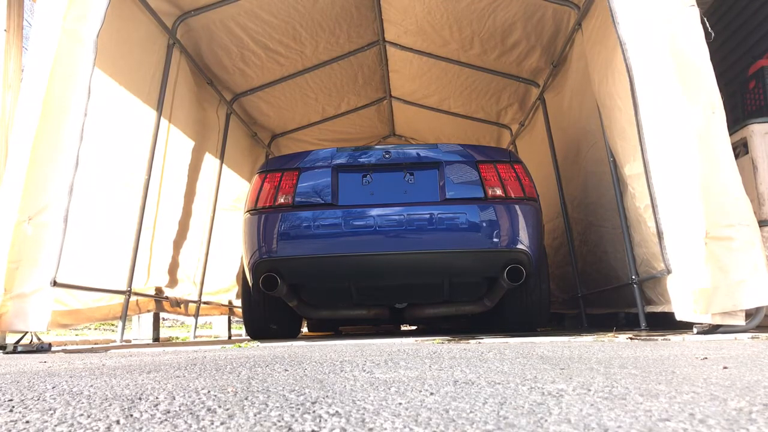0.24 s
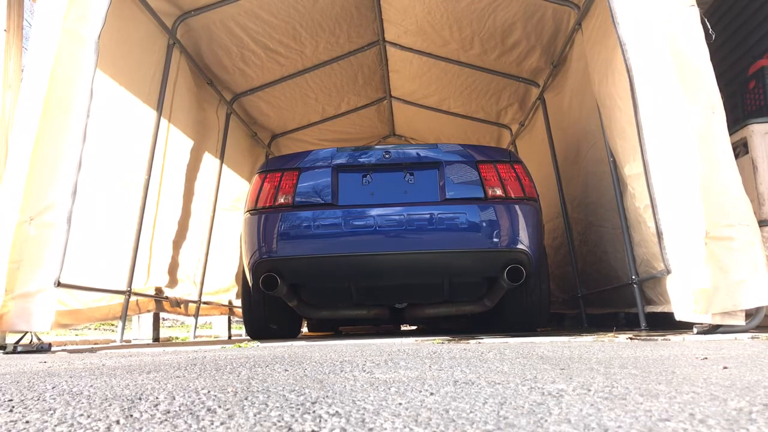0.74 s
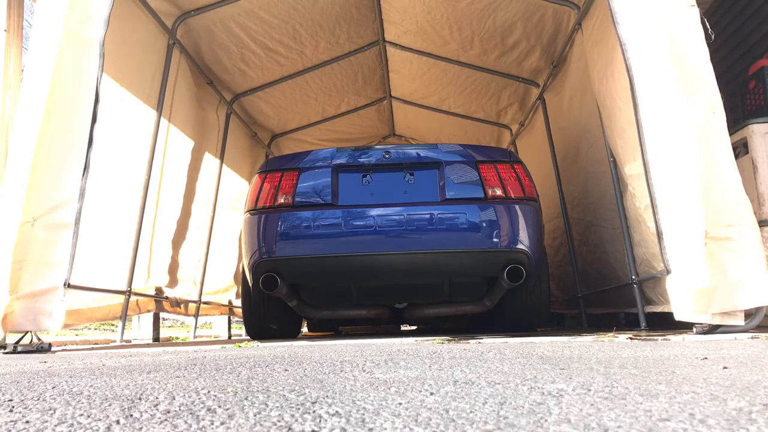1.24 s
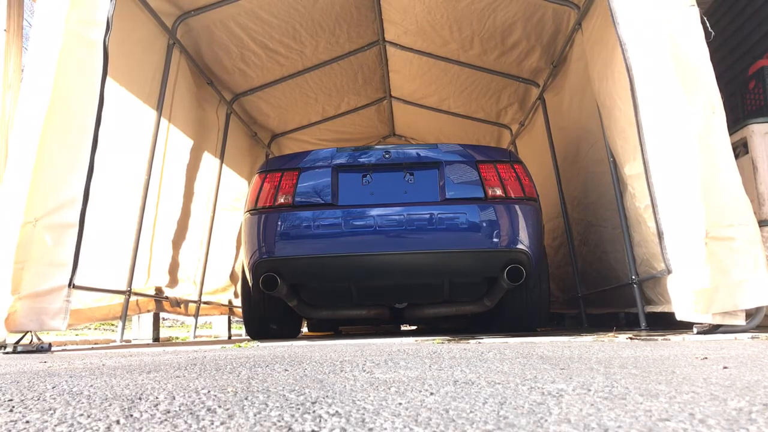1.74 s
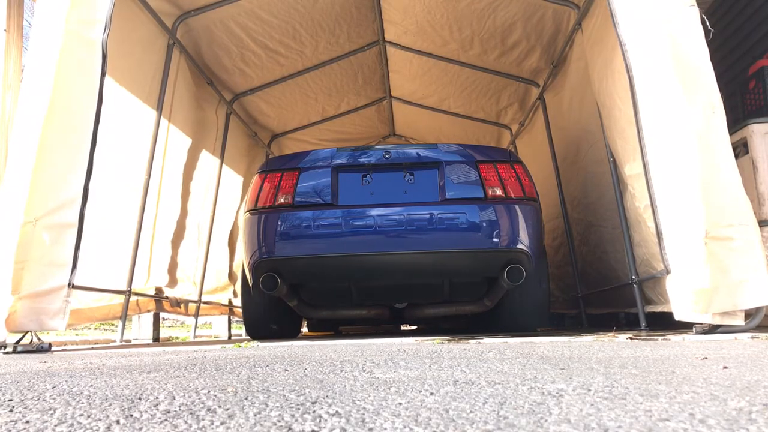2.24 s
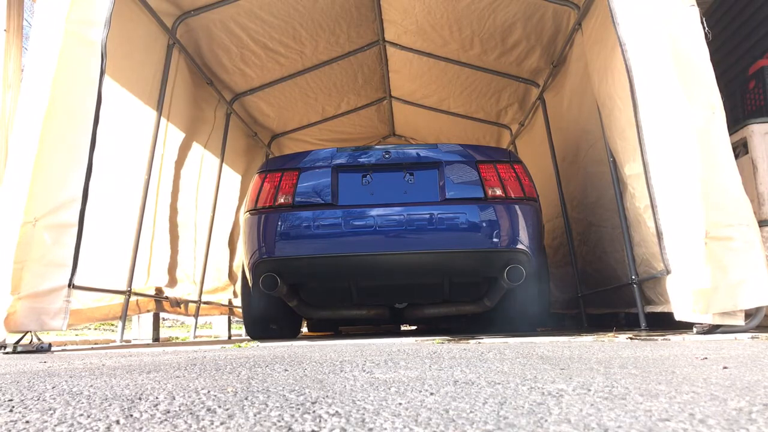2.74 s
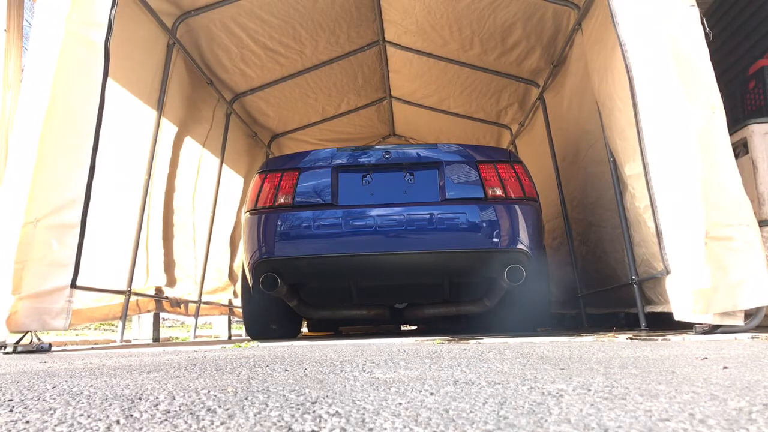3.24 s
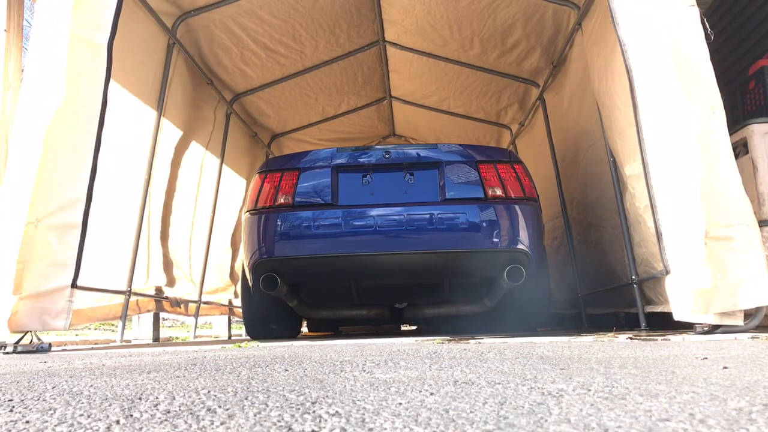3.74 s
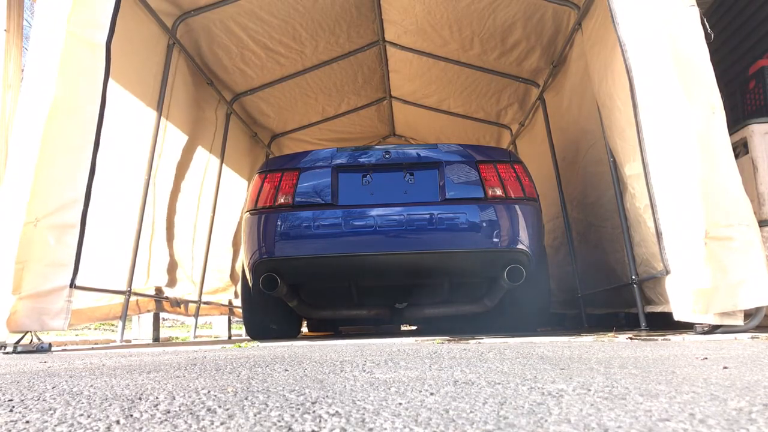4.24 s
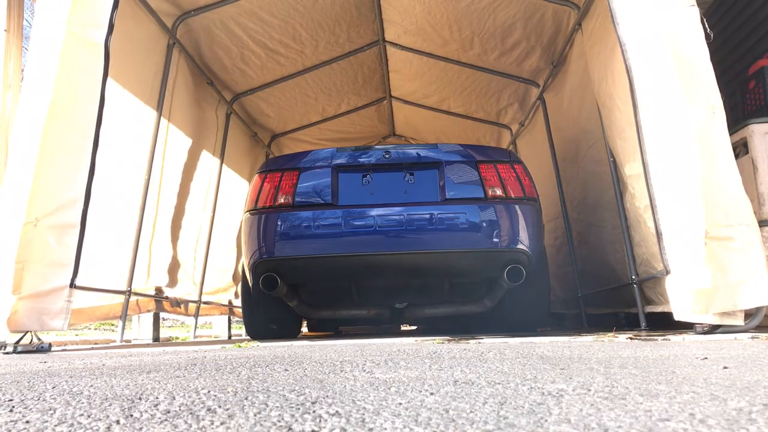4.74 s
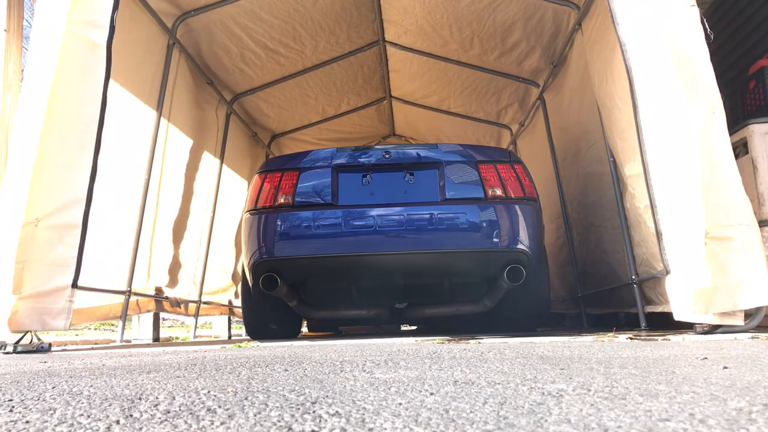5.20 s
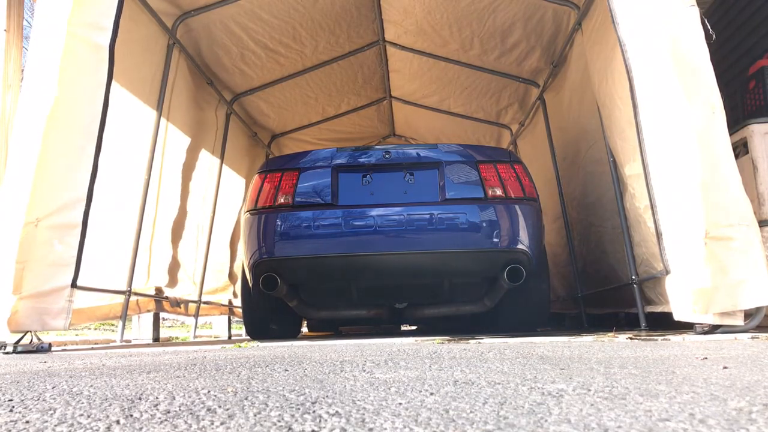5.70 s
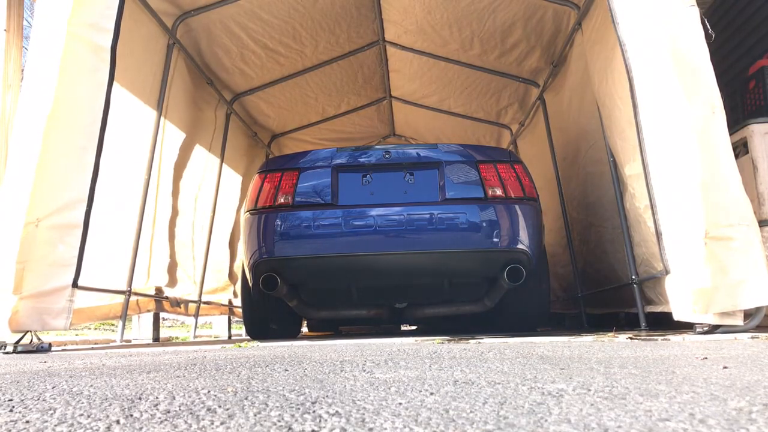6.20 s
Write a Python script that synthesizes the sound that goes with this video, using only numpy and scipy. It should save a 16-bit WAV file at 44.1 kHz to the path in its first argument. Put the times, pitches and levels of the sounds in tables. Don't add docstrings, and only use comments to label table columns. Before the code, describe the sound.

Heard from low behind a car in a fabric carport: a starter grinds in quick pulses for half a second, then the engine catches with a boom and bright tinny rasp, races briefly and eases into a fast droning idle, throbbing unevenly, with soft mechanical hiss. A small click and skip occurs early in the idle.

```python
import sys
import numpy as np
from scipy import signal
from scipy.fft import rfft, irfft
from scipy.io import wavfile

SR = 44100
rng = np.random.default_rng(int(sys.argv[2]) if len(sys.argv) > 2 else 0)


def field_ratio(decibels):
    return 10 ** (np.asarray(decibels, dtype=float) / 20)


def dump_mix(stems):
    frames = np.atleast_2d(stems).T
    limited = np.clip(frames, -1, 1)
    pcm = np.round(limited * 32767).astype(np.int16)
    wavfile.write(sys.argv[1], SR, pcm)


N = 284886
T = np.arange(N) / SR
HZ = np.fft.rfftfreq(N, 1 / SR)

# (time [s], grind [dB], gear tone [Hz], gear tone level [dB])
STROKES = [
    (.015, -37.5, 329.6, -36),
    (.075, -41, 305.6, -35),
    (.165, -38.5, 336.8, -26.5),
    (.268, -38, 378.6, -42),
    (.365, -37, 405.5, -38),
    (.49, -41.5, 344, -40),
]
STROKE_HALF_S, GEAR_HALF_S, COAST_DB, STARTER_OFF_S = 0.043, 0.026, -39.5, 0.497
GEAR_DB, GEAR_LAG_S, WHIRR_DB = -49.5, 0.0079, -55.5
GROAN_S, GROAN_HZ, GROAN_DB, GROAN_HALF_S, GROAN_SAG_HZ_PER_S = .36, 843, -31.5, 0.0253, 550
# (frequency [Hz], level [dB per Hz])
GRIND_COLOUR = [(35, -46), (60, -19), (76, -36), (168, -4), (338, 5), (515, -16), (682, -9), (822, -2),
                (1090, -8), (1200, -12.5), (1910, -1), (2090, 1.5), (6280, -8.5), (11500, -21.5),
                (16000, -31.5)]
# (frequency [Hz], width [Hz], level [dB])
BODY = [(104, 88, 8), (726, 67, -4), (1000, 430, -8), (1191, 29, -1.5), (1400, 140, -6.5), (1612, 9, 3),
        (2080, 55, -22.5), (2390, 30, -16), (2885, 7.8, -4), (4160, 4.3, -5.5)]

# (time [s], level [dB], half-length [s])
GUSTS = [
    (.05, -34, 0.18),
    (.58, -8.5, 0.057),
    (.97, -41, .05),
    (1.17, -45, 0.087),
    (2.39, -43, .05),
    (5.78, -49, 0.033),
]
CALM_DB = -60

# (time [s], speed [engine cycles per s])
SPEED_BEFORE = [
    (0.5, 4.97),
    (0.64, 10.227),
    (0.79, 14.145),
    (0.9, 15.153),
    (1.09, 14.651),
    (1.75, 13.674),
    (2.02, 13.044),
    (2.4, 13.906),
]
SPEED_AFTER = [(2.5, 13.855), (2.87, 13.752), (3.47, 13.372), (4.48, 13.373), (4.82, 13.5), (5.1, 13.399),
               (5.71, 13.362), (6.01, 13.199)]
# (time [s], share of a cycle)
MARK_BEFORE, MARK_AFTER = (.72, .537), (2.42, .574)
CUT_S, CUT_STEP = 2.39306, -0.25
IDLE_SPEED = 13.4

FIZZ_DB, FIZZ_S, FIZZ_CUT_S, FIZZ_CUT_LEN_S = -43, 0.43, .7, 0.095
# (frequency [Hz], level [dB per Hz])
FIZZ_COLOUR = [(3000, -30), (7000, 6), (10000, -0.5), (14000, -12), (16000, -15)]
RASP_S, RASP_RISE_S, RASP_HOLD_S, RASP_DB, RASP_FALL_DB_PER_S = 0.462, 0.1, 0.63, -32, 105
LINGER_DB, LINGER_AT_S, LINGER_S = -40.5, 0.83, 0.31
# (frequency [Hz], level [dB per Hz])
RASP_COLOUR = [(350, -53), (600, 2), (748, -6), (801, -5.5), (1100, -14.5), (1640, -8.5), (2240, -19),
               (3730, -13), (4580, -14.5), (6640, -20), (10500, -28), (12800, -27), (16000, -40)]
# (frequency [Hz], width [Hz], level [dB])
TIN = [(1715, 170, 1.5), (2980, 32, 2), (3760, 320, -3), (6340, 500, -11)]
# (frequency [Hz], level [dB per Hz])
IDLE_COLOUR = [(590, 3), (1000, 0.5), (1070, -12), (1190, -9), (1610, -4.5), (1750, -6), (2050, -9),
               (3710, -7), (5130, -13.5), (6470, -12), (8750, -19), (10400, -21.5), (12300, -22),
               (15100, -26.5), (16000, -45.5)]
IDLE_DB = -47.5

# (push into first pipe [ratio], its lag [ms], push into second pipe [ratio], its lag [ms])
CYLINDERS = [(0.11, 0.55, 0.42, -0.44), (0.25, -1.36, 0.28, -0.57), (0.23, 0.44, 0.27, -0.73),
             (-1.0, -0.48, 1.0, 1.52), (0.19, 2.74, 0.65, 0.2), (0.21, -0.56, 0.38, -0.42),
             (0.51, -1.35, 0.29, -0.78), (-0.22, 0.25, 0.56, 0.21)]
# (frequency [Hz], width [Hz], level [dB], polarity [+1 or -1])
PIPE_1 = [(50.0, 60.6, -44.1, 1), (87.7, 19.6, -36.5, 1), (211.7, 14.1, -30.4, -1),
          (278.8, 11.0, -26.1, -1), (299.0, 11.0, -27.4, -1), (302.8, 11.0, -24.0, 1),
          (349.5, 11.0, -41.8, 1), (372.6, 16.1, -31.3, 1), (468.5, 13.6, -29.5, 1),
          (479.9, 20.7, -38.0, -1), (531.7, 15.3, -35.7, -1), (603.9, 112.4, -36.2, 1),
          (613.6, 78.1, -35.6, -1)]
PIPE_2 = [(106.8, 14.9, -24.9, 1), (201.8, 13.2, -26.8, 1), (270.3, 11.0, -37.7, -1),
          (300.7, 11.0, -25.2, 1), (346.0, 18.5, -31.9, -1), (348.2, 38.9, -31.6, 1),
          (384.4, 11.0, -35.1, -1), (466.5, 11.0, -48.1, 1), (492.0, 13.2, -44.0, -1),
          (512.0, 11.0, -48.0, 1), (533.4, 12.9, -37.6, -1), (658.7, 27.5, -56.8, -1),
          (784.8, 11.0, -66.9, 1)]
# (frequency [Hz], width [Hz], level [dB], polarity [signed ratio])
TIPS = [(498, 22, -38, -0.15), (521, 16, -51.5, -0.46), (574.6, 10.3, -37, 0.14), (593, 13, -44, 0.65),
        (693, 15, -43.5, -0.32), (818.5, 30, -49.5, 0.37), (932, 27, -70, -2.3), (1060, 18, -54.5, 0.55)]
TIP_PUSH = [0.28, 0.25, 0.63, 0.072, 0.34, 0.62, 1, 0.46]
# (time [s], extra push [dB], sharpness of the pulse [dB])
SURGE = [
    (.46, -54, 4),
    (.49, 3, -3),
    (.535, 6, -3.5),
    (.575, 13.5, -3.5),
    (.605, 18.5, -6.5),
    (.67, 13, -6.5),
    (.72, 5.5, -1.5),
    (.8, -2, 7),
    (1.1, 0, 0.5),
]
# (level at idle [dB], slope [dB per cycle/s above idle])
PUSH, BITE, CRACK = (-0.91, 3.26), (2.06, -4.5), (-0.37, 2.8)
BITE_PER_S = 0.36
RAGGED, EVEN, FREE_S, SETTLE_S = 0.28, 0.045, .71, .07
DRONE_DB, DRONE_DIP_DB, DRONE_DIP_ONSET_S, DRONE_RECOVERY_S = .6, -16.5, 0.042, 0.26
LUG_DRONE, RAGGED_DRONE_DB = -16.5, 0.5
LUG_BITE, LUG_SECOND = 13.8, 14.7
LAZY_AT, LAZY_WIDTH, LAZY, LAZY_SLOPE = .37, .06, .12, -1.2

# (time [s], frequency [Hz], level [dB], half-length [s])
BOOMS = [
    (0.543, 88, -18, 0.036),
    (.597, 101.7, -9, 0.039),
]
# (multiple of the firing rate [ratio], level [dB], fade [s])
CLIMB = [
    (1, -22, 0.26),
    (2, -18.5, .14),
    (3, -21, 0.16),
]
CLIMB_S, CLIMB_RISE_S = .765, 0.077
TONE_LAG, LAG_PER_SPEED, LAG_FULL_SPEED = .28, .17, 14.6


def evened(x):
    return x / np.sqrt(np.mean(x ** 2) + 1e-20)


def columns(rows):
    s, *values = np.transpose(rows)
    return [np.interp(T, s, v) for v in values]


def swell(s, half):
    return np.exp(-((T - s) / half) ** 2)


def wobble(hz):
    return evened(irfft(rfft(rng.standard_normal(N)) / (1 + (HZ / hz) ** 4), N))


def coloured(x, points):
    f, db = np.transpose(points)
    gain = field_ratio(np.interp(np.log(HZ + 1), np.log(f + 1), db)) * (HZ < 15750)
    return evened(irfft(rfft(x) * gain, N))


def modes(rows):
    return sum(np.prod(sign) * field_ratio(db) * hz * width / (hz ** 2 - HZ ** 2 + 1j * HZ * width)
               for hz, width, db, *sign in rows)


def ringing(x, rows):
    power = sum(abs(modes([row])) ** 2 for row in rows)
    return evened(irfft(rfft(x) * np.sqrt(power) * HZ / (HZ + 800), N))


def starter():
    stroke_s, _, gear_hz, _ = np.transpose(STROKES)
    hz = np.interp(T, stroke_s, gear_hz)
    load = field_ratio(COAST_DB) + sum(field_ratio(db) * swell(s, STROKE_HALF_S) ** 1.3 for s, db, _, _ in STROKES)
    mesh = field_ratio(GEAR_DB) + sum(field_ratio(db) * swell(s + GEAR_LAG_S, GEAR_HALF_S) for s, _, _, db in STROKES)
    turns = np.cumsum(hz * (1 + 0.029 * wobble(57))) / SR
    teeth = (0.85 + np.exp(-(turns % 1) / 0.73)) * rng.standard_normal(N)
    grind = coloured(teeth, GRIND_COLOUR) + field_ratio(-1.5) * ringing(teeth, BODY)
    motor = load * field_ratio(0.76 * wobble(34)) * grind
    motor += field_ratio(WHIRR_DB) * coloured(teeth, FIZZ_COLOUR)
    motor += mesh * np.sin(2 * np.pi * turns)
    groan_hz = GROAN_HZ - GROAN_SAG_HZ_PER_S * (T - GROAN_S)
    groan = np.sin(2 * np.pi * np.cumsum(groan_hz) / SR)
    groan = field_ratio(GROAN_DB + 2.0 * wobble(48)) * groan * swell(GROAN_S, GROAN_HALF_S)
    return motor * np.clip((STARTER_OFF_S - T) / 0.04, 0, 1) + groan


def rumble():
    air = coloured(rng.standard_normal(N),
                   [(12, -38), (30, 2.0), (50, 4.5), (70, -18.5), (120, -44.0), (400, -69.5)])
    gusts = sum(field_ratio(db) * swell(s, half) for s, db, half in GUSTS)
    return field_ratio(-14.5) * (field_ratio(CALM_DB + 2.5 * wobble(4.0)) + gusts) * air


def crank(speed, mark):
    cycles = np.cumsum(columns(speed)[0]) / SR
    mark_s, share = mark
    return cycles - np.interp(mark_s, T, cycles) + share + 100


def puffs(cycles, depth, throb):
    gate = 1 - depth + depth * np.exp(-(8 * cycles % 1) / .35)
    return gate * field_ratio(throb * np.cos(2 * np.pi * (cycles - .6))) * rng.standard_normal(N)


def hiss(cycles):
    gas = puffs(cycles, 0.24, throb=0.42)
    tin_fade = np.clip((.82 - T) / .08, 0, 1)
    rasp = coloured(gas, RASP_COLOUR) + field_ratio(-5) * ringing(gas, TIN) * tin_fade
    after = np.maximum(T - RASP_HOLD_S, 0)
    flare = field_ratio(RASP_DB - RASP_FALL_DB_PER_S * after) * np.clip((T - RASP_S) / RASP_RISE_S, 0, 1)
    flare += field_ratio(LINGER_DB) * swell(LINGER_AT_S, LINGER_S) * np.clip((T - FIZZ_S) / 0.097, 0, 1)
    fizz_gate = (T >= FIZZ_S) * np.interp(T, [FIZZ_CUT_S, FIZZ_CUT_S + FIZZ_CUT_LEN_S], [1, 0])
    fizz = field_ratio(FIZZ_DB) * fizz_gate * coloured(gas, FIZZ_COLOUR)
    ticks = (rng.random(N) < 150 / SR) * rng.standard_normal(N) * field_ratio(4.0)
    works = puffs(cycles, 0.26, throb=0.56) + ticks
    idle = coloured(works, IDLE_COLOUR) + field_ratio(-9.0) * ringing(works, BODY)
    idle *= field_ratio(IDLE_DB + 0.47 * wobble(6.1)) * np.clip((T - .45) / 0.29, 0, 1)
    return idle + flare * rasp + fizz


def burning(cycles):
    over = np.clip(np.gradient(cycles) * SR - IDLE_SPEED, -.4, 1.8)
    free = np.maximum(T - FREE_S, 0)
    settling = np.exp(-free / SETTLE_S)
    lug = np.maximum(-over, 0) * (T > FREE_S + .1)
    surge_db, sharp_db = columns(SURGE)
    push_db, bite_db, crack_db = (base + slope * over for base, slope in (PUSH, BITE, CRACK))
    bite_db = bite_db + sharp_db + BITE_PER_S * T + LUG_BITE * lug
    drone_db = DRONE_DB + RAGGED_DRONE_DB * settling + LUG_DRONE * lug
    drone_db += DRONE_DIP_DB * (1 - np.exp(-free / DRONE_DIP_ONSET_S)) * np.exp(-free / DRONE_RECOVERY_S)
    drone_db += np.minimum(sharp_db, 0)
    uneven = np.clip(EVEN + (RAGGED - EVEN) * settling, 0, 1)
    lazy = np.clip(LAZY + LAZY_SLOPE * over, 0, 1)
    lazy = lazy * np.exp(-((cycles % 1 - LAZY_AT) / LAZY_WIDTH) ** 2)
    return push_db + surge_db, uneven, bite_db, drone_db, crack_db + sharp_db, 1 - lazy, LUG_SECOND * lug


def exhaust(cycles):
    push_db, uneven, bite_db, drone_db, crack_db, firm, second_db = burning(cycles)
    slot = np.arange(np.ceil(8 * cycles[0]), 8 * cycles[-1])
    s = np.interp(slot / 8, cycles, T)
    turn = slot.astype(int) % len(CYLINDERS)
    cylinder = np.array(CYLINDERS)[turn]
    chance = rng.standard_normal((len(s), 3))
    spread = np.interp(s, T, uneven)
    size = field_ratio(np.interp(s, T, push_db)) * (1 + spread * chance[:, 0]) * SR / 26.8
    spectrum = 0
    for k, pipe in enumerate((PIPE_1, PIPE_2)):
        lag_s = cylinder[:, 2 * k + 1] / 1000 + .0012 * spread * chance[:, k + 1]
        at = np.clip(np.round((s + lag_s) * SR).astype(int), 0, N - 1)
        drive = np.bincount(at, size * cylinder[:, 2 * k], N)
        drive += field_ratio(20.5 + push_db) * np.sqrt(uneven) * rng.standard_normal(N)
        spectrum = spectrum + rfft(drive) * modes(pipe) / (1 + (HZ / 530) ** 16)
    snap = np.bincount(at, size * np.array(TIP_PUSH)[turn], N)
    snap += field_ratio(43.5 + push_db) * np.sqrt(uneven) * puffs(cycles, 0.71, throb=2.3)
    spectrum += rfft(snap * field_ratio(crack_db)) * modes(TIPS) / (1 + (400 / (HZ + 1)) ** 8)
    spectrum *= np.exp(-(HZ / 1100) ** 2) * (1j * HZ / (1j * HZ + 40)) ** 2
    upper = irfft(spectrum / (1 + (340 / (HZ + 1)) ** 4), N)
    drone = irfft(spectrum / (1 + ((HZ - 295) / 35) ** 2), N)
    second = irfft(spectrum / (1 + ((HZ - 210) / 25) ** 2), N)
    out = irfft(spectrum, N) + (field_ratio(bite_db) - 1) * upper
    out += (field_ratio(drone_db) - 1) * drone + (field_ratio(second_db) - 1) * second
    return out * firm * (T > SURGE[0][0])


def boom(cycles):
    rung = sum(field_ratio(db) * swell(s, half) * np.sin(2 * np.pi * hz * (T - s)) for s, hz, db, half in BOOMS)
    slow = LAG_PER_SPEED * np.maximum(LAG_FULL_SPEED - np.gradient(cycles) * SR, 0)
    rise = np.where(T < CLIMB_S, swell(CLIMB_S, CLIMB_RISE_S), 1)
    after = np.maximum(T - CLIMB_S, 0)
    climb = 0
    for k, db, fade in CLIMB:
        turns = k * len(CYLINDERS) * cycles - TONE_LAG + slow / k
        climb = climb + field_ratio(db) * np.exp(-after / fade) * np.cos(2 * np.pi * turns)
    return np.sqrt(2) * (rung + rise * climb)


def scene():
    before, after = crank(SPEED_BEFORE, MARK_BEFORE), crank(SPEED_AFTER, MARK_AFTER)
    first, second = exhaust(before), exhaust(after)
    cut = round(CUT_S * SR)
    settle = np.exp(-abs(T - CUT_S) / .003)
    second = second + (first[cut] + CUT_STEP - second[cut]) * settle
    engine = np.where(T < CUT_S, first, second)
    cycles = np.where(T < CUT_S, before, after)
    return (starter() + rumble() + hiss(cycles) + engine + boom(before))[None]


def top_cut(x):
    return signal.sosfilt(signal.butter(12, 16480, fs=SR, output="sos"), x)


def record(dry):
    port = 1 - 0.26 / (1 + ((HZ - 10450) / 500) ** 2)
    heard = irfft(rfft(dry) * port, N)
    rounded = heard / (1 + (heard / .76) ** 6) ** (1 / 6)
    return top_cut(rounded)


dry = scene()
out = record(dry)
dump_mix(out)
```